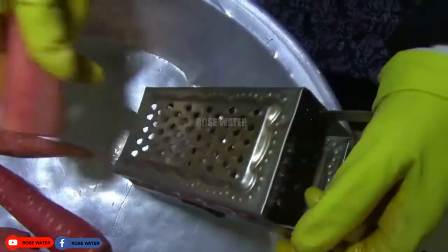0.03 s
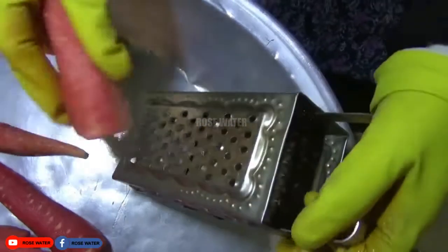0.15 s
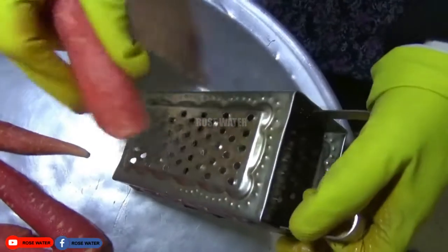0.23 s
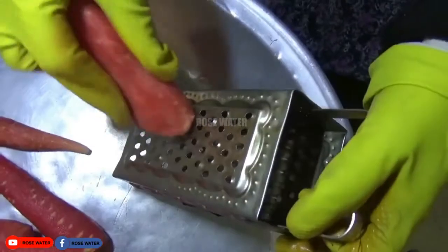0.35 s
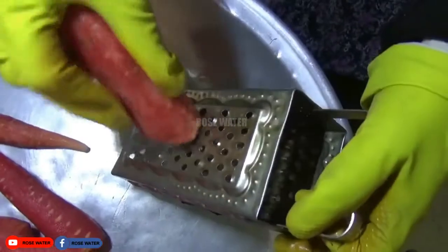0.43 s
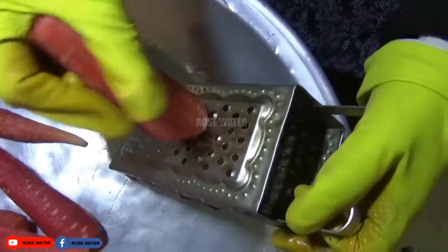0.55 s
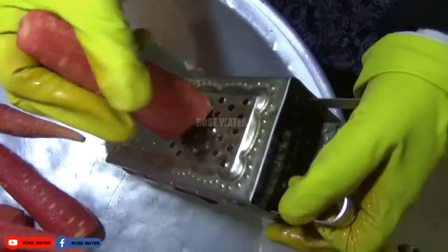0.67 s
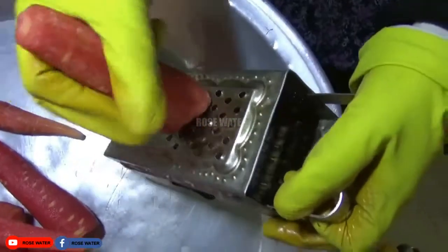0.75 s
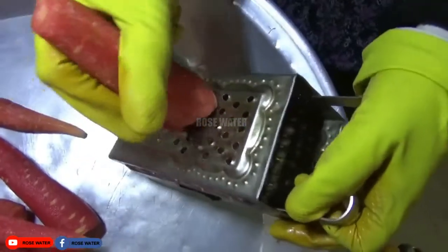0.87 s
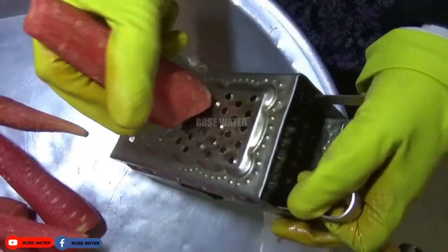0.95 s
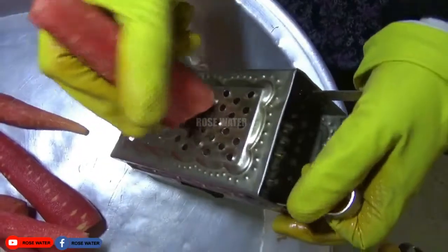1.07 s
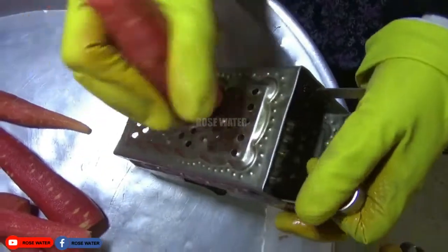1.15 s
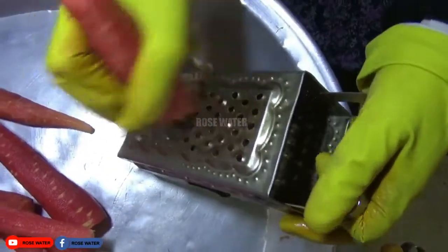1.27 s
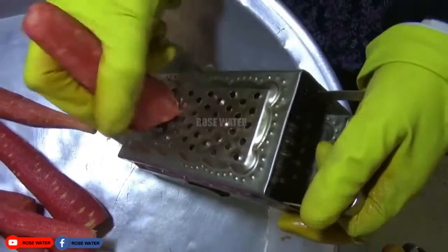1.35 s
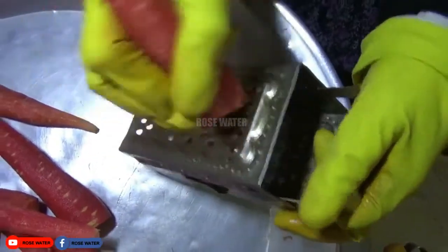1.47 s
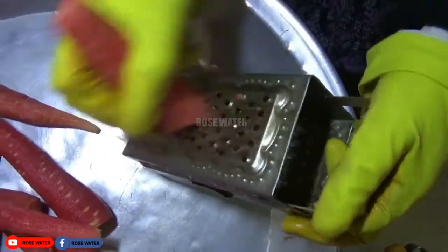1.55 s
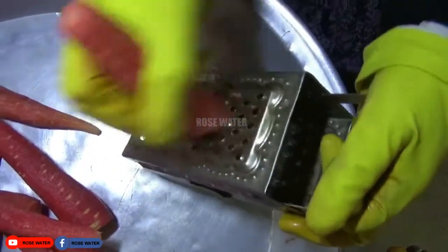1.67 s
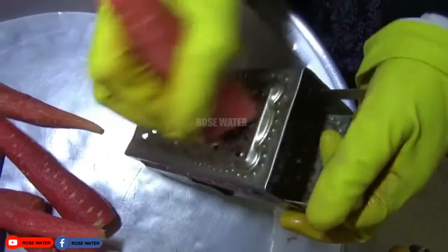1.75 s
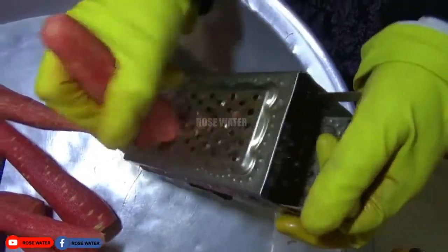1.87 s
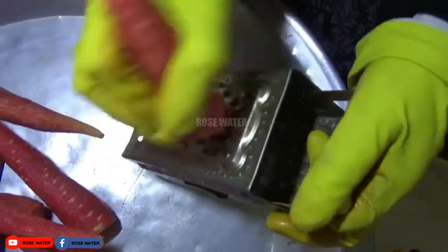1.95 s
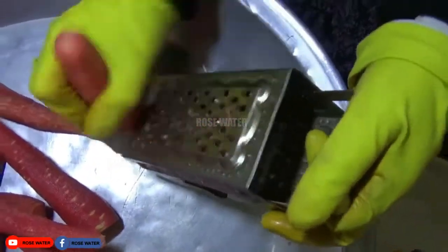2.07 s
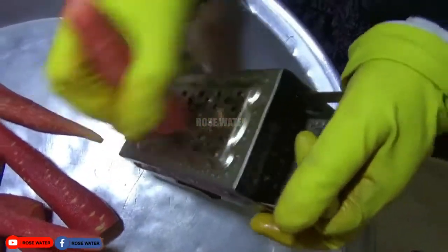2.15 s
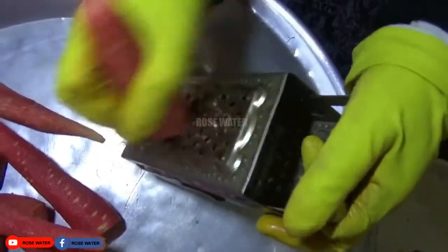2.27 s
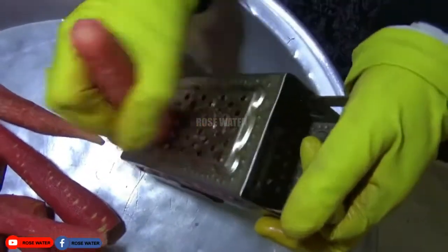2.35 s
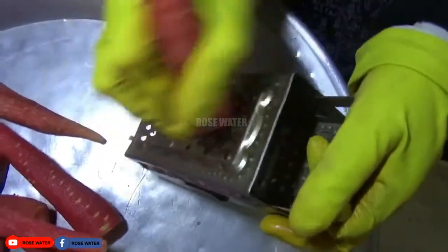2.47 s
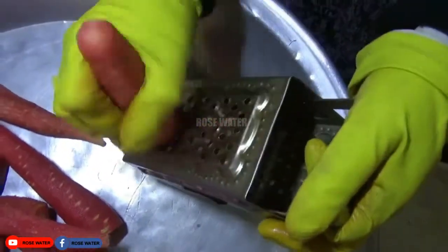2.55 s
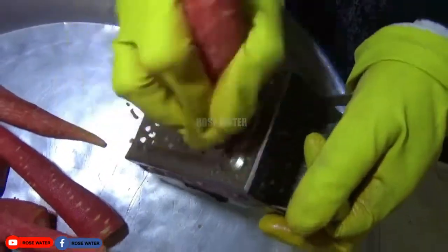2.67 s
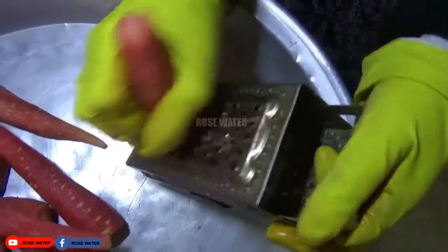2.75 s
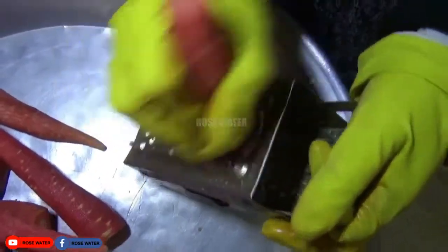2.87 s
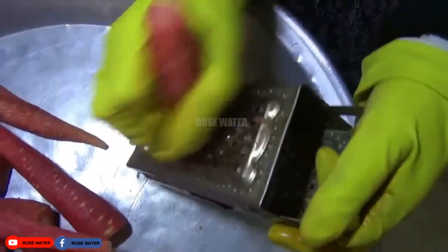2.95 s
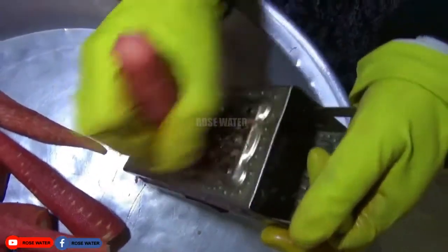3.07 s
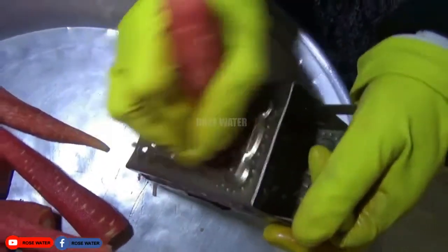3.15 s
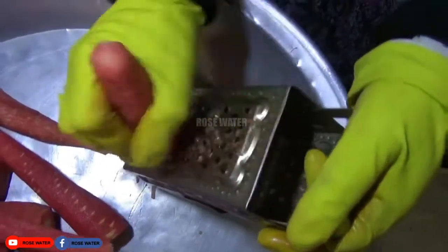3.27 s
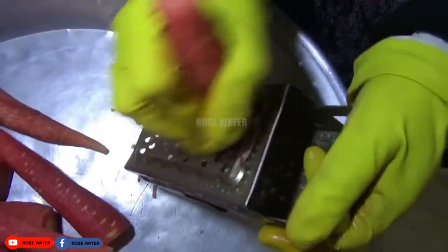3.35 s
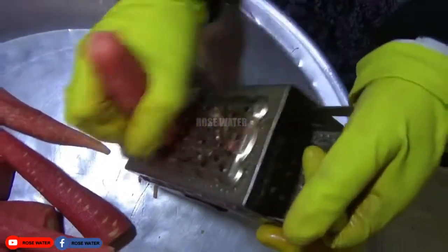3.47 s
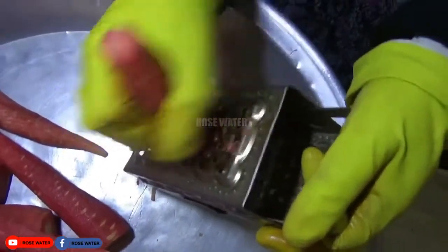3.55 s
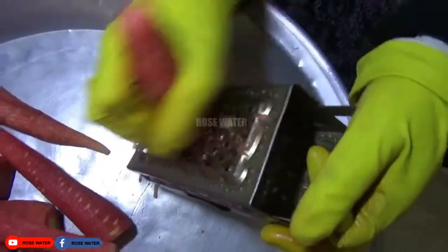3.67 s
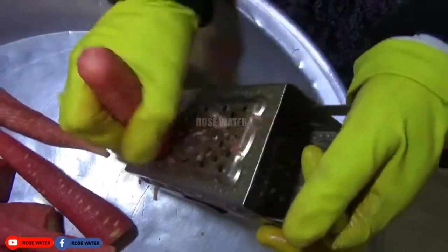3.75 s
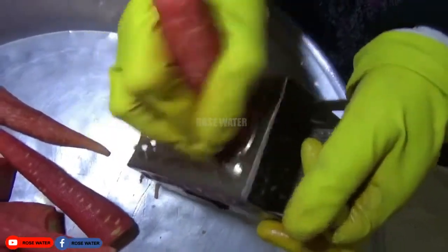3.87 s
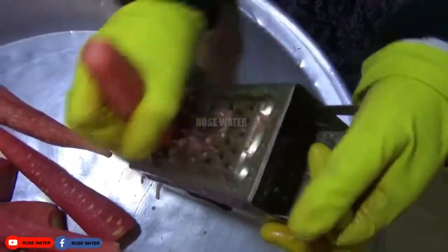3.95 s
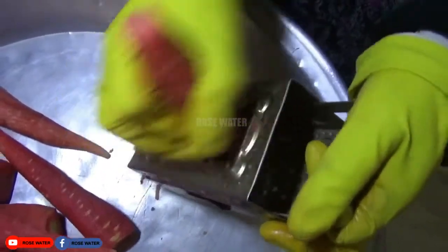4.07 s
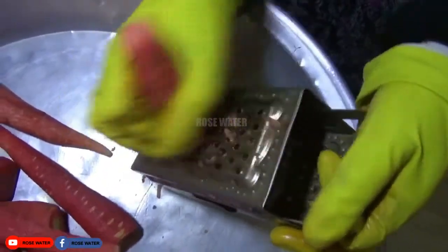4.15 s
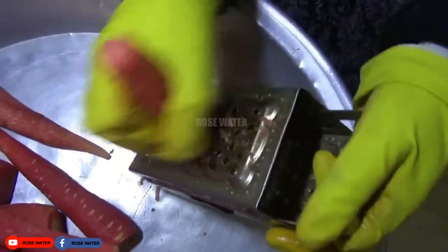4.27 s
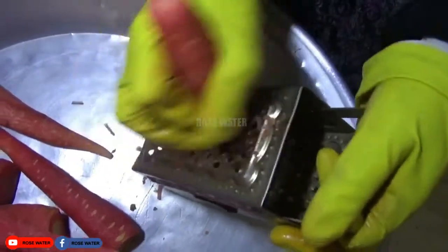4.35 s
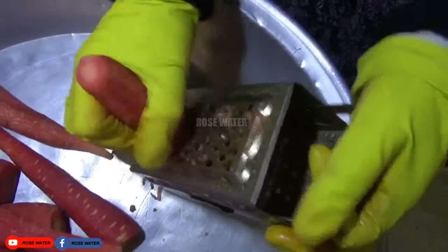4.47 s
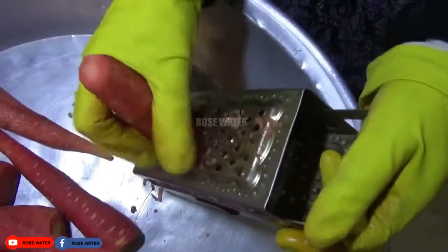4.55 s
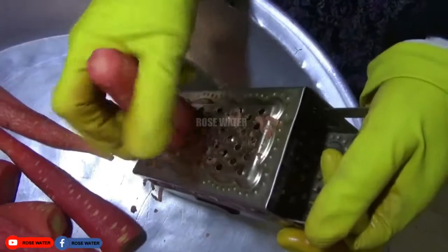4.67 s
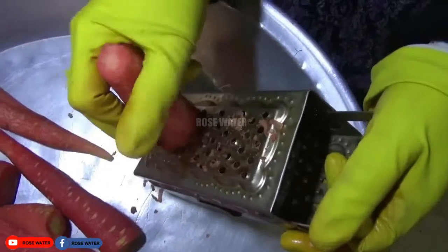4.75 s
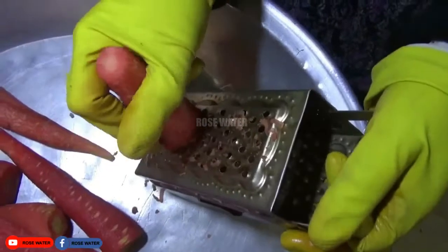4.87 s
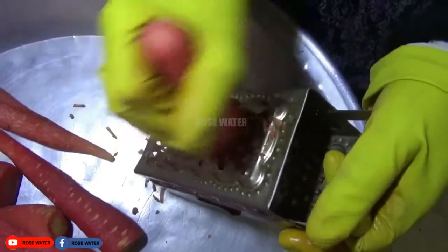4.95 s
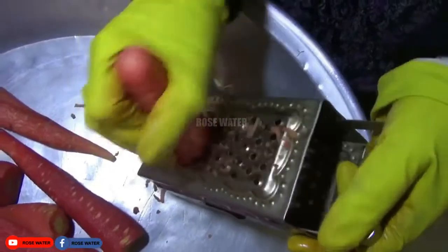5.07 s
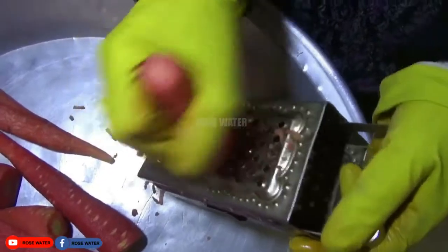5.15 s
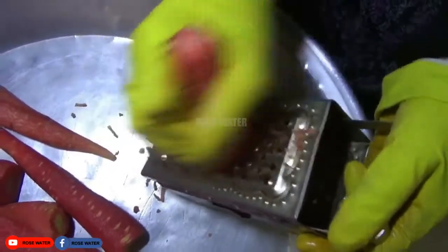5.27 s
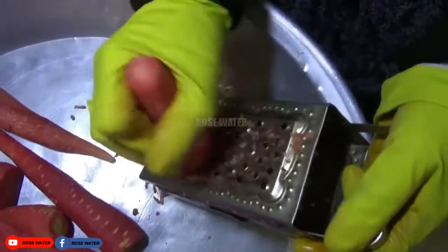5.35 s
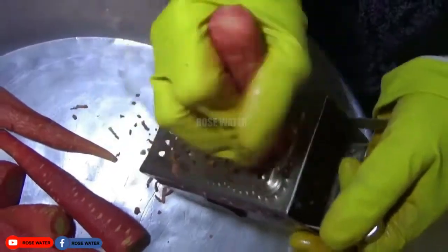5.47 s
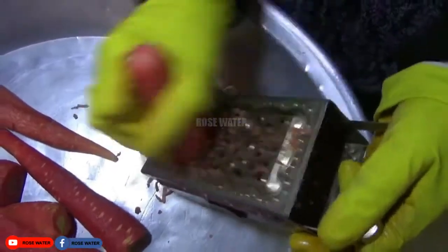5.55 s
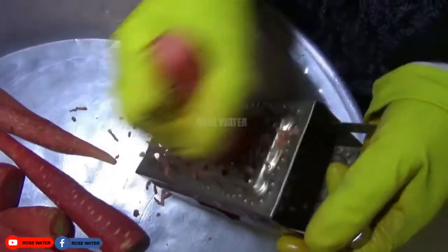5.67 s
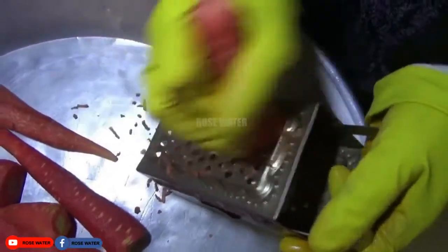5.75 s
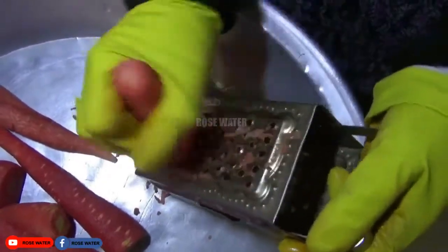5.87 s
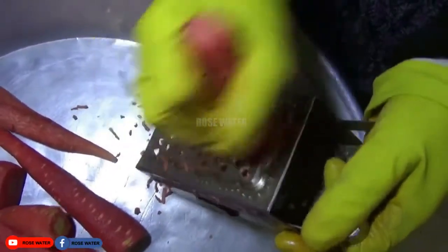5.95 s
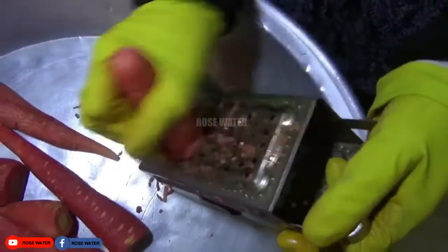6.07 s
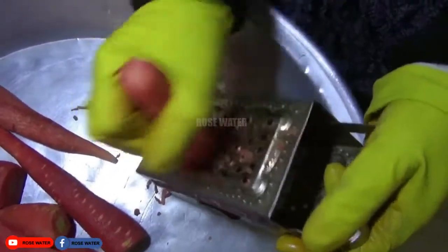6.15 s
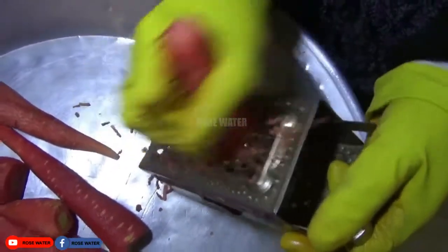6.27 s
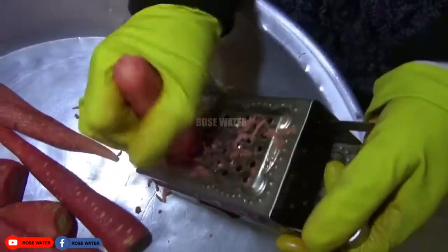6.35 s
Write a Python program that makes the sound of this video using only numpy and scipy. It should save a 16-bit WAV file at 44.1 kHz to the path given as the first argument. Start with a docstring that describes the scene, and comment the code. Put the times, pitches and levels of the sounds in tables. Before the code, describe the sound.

Close up in a kitchen, a carrot scrapes rapidly back and forth over a metal box grater, with a bright, gritty rasp and small hollow knocks. A few taps and faint rubber glove rustles come first. The strokes then run for about three seconds, with the steel tray clattering briefly underneath, break off for a short glove rustle, and resume at the same pace.

```python
"""A carrot rubbed fast up and down a sheet-metal box grater on a steel tray, in a kitchen, close to a
stereo microphone. The teeth tear fibres in dense clicks that ring the sheet and drum the hollow box.
The carrot lands with a knock and skips as it turns round; the grater bumps the tray, which rings.
Rubber gloves rustle in the pauses, over faint room air and short echoes."""
import sys
import numpy as np
from scipy import signal
from scipy.fft import rfft, irfft
from scipy.io import wavfile
from scipy.ndimage import uniform_filter1d

SR = 44100
rng = np.random.default_rng(int(sys.argv[2]) if len(sys.argv) > 2 else 0)


def digitize_waveform(pressure):
    """Quantize a signal to 16-bit integers and store it at the path in sys.argv[1].

    Rows of a 2-D input are taken as channels; values are limited to [-1, 1].
    """
    field = np.atleast_2d(pressure).T
    bounded = np.clip(field, -1, 1)
    quanta = np.round(bounded * 32767).astype(np.int16)
    wavfile.write(sys.argv[1], SR, quanta)


N = 282681
STEP_S = .001  # time step of the hand's gestures

# strokes of the carrot: start_s, length_s, level_db, bite (1 cuts down into the teeth, 0 drags back)
STROKES = [(1.479, 0.061, -20, 0.63), (1.614, .085, -21.5, 0.081), (1.746, 0.068, -17.5, 0.51),
           (1.883, 0.068, -21, 0.088), (1.989, 0.073, -18.5, 0.79), (2.127, 0.063, -21.5, 0.58),
           (2.228, 0.063, -19.5, 1), (2.307, 0.026, -20.5, 0.041), (2.337, 0.065, -23, .02),
           (2.389, 0.04, -23, 0.46), (2.461, .079, -18.5, 0.6), (2.581, 0.049, -23, .2),
           (2.639, 0.019, -24, 0.45), (2.701, 0.068, -19, 1), (2.822, 0.066, -22, 0.5),
           (2.927, 0.064, -18, 0.88), (3.049, 0.072, -22.5, 0.075), (3.154, 0.066, -18.5, 0.93),
           (3.29, 0.07, -22.5, 0.29), (3.384, 0.081, -18, 0.69), (3.517, 0.078, -24, 0.13),
           (3.626, 0.071, -18, 0.98), (3.766, .075, -21.5, .1), (3.863, 0.09, -18.5, 0.85),
           (4.001, 0.085, -21.5, 0.43), (4.113, 0.078, -18, 0.77), (4.248, 0.043, -24, 0.41),
           (4.294, 0.034, -23.5, .2), (4.349, 0.085, -17.5, 0.59), (4.5, 0.05, -20.5, 0.044),
           (4.579, 0.06, -18, .9), (5.119, 0.078, -28, 0.58), (5.236, 0.062, -17.5, 0.49),
           (5.383, .064, -23, 0.1), (5.478, 0.078, -18, 0.38), (5.626, 0.067, -21.5, 0.2),
           (5.73, .075, -17.5, 0.6), (5.873, 0.077, -20.5, 0.12), (5.976, 0.081, -18, 0.76),
           (6.132, 0.067, -20.5, 0.4), (6.234, 0.066, -18, 0.9), (6.373, .06, -26, 0.14)]
# resonances of the grater's sheet: pitch_hz, width_hz, level_db
SHEET_MODES = [(263, 7.3, -9), (820, 135, -11.5), (1330, 50, -22), (2176, 130, -6), (3160, 280, -43),
               (4170, 34, -5), (5270, 670, -17.5), (6100, 96, -5), (6900, 380, 1.5), (7900, 760, -2),
               (10130, 370, -6.5)]


def gain_of(db):
    """Decibels to amplitude."""
    return 10 ** (np.asarray(db) / 20)


def unit_rms(x):
    """Scales x to an RMS of one."""
    return x / np.sqrt(np.mean(x ** 2) + 1e-20)


def steadied(x):
    """Takes out chance swells slower than about 15 ms, so that the hand sets the level."""
    return x / np.sqrt(uniform_filter1d(uniform_filter1d(x ** 2, 600), 600) + 1e-9)


def smoothed(grid, bins, frames):
    """Averages a spectrogram-shaped grid over frequency and time."""
    return uniform_filter1d(uniform_filter1d(grid, bins, axis=0), frames, axis=1)


def curve_at(points, hz):
    """Interpolates (frequency_hz, value) points over log frequency."""
    points_hz, values = np.transpose(points)
    return np.interp(np.log(hz + 1), np.log(points_hz + 1), values)


def coloured(x, spectrum):
    """Filters x by a spectrum in dB, to unit RMS."""
    hz = np.fft.rfftfreq(len(x), 1 / SR)
    return unit_rms(irfft(rfft(x) * gain_of(curve_at(spectrum, hz)), len(x)))


def band_passed(x, low_hz, high_hz):
    """One band of x, at unit RMS."""
    band = signal.butter(2, [low_hz, high_hz], "band", fs=SR, output="sos")
    return unit_rms(signal.sosfilt(band, x))


def clicks(per_s, spread_db):
    """Clicks at random times and of random sign; a few are larger."""
    size = gain_of(spread_db * np.minimum(rng.exponential(1, N), 2.5))
    return size * rng.choice([-1., 1.], N) * (rng.random(N) < per_s / SR)


def wandering(x, narrow_db, wide_db):
    """The contact moves, so narrow modes and wide bands flare and fade at random."""
    hz, t, spectra = signal.stft(x, SR, nperseg=1024, noverlap=896)
    narrow, wide = rng.standard_normal((len(t), len(hz), 2)).T
    flare_db = narrow_db * unit_rms(smoothed(narrow, bins=2, frames=10))
    flare_db += wide_db * unit_rms(smoothed(wide, bins=24, frames=4))
    return unit_rms(signal.istft(spectra * gain_of(flare_db), SR, nperseg=1024, noverlap=896)[1][:N])


def played_by_hand(level_db, treble_db, low_db, judder_db, high, low):
    """Gestures (rows over time) shape a high and a low texture; the loudest one sets the colour."""
    power = gain_of(2 * level_db)
    total = power.sum(axis=0) + 1e-12
    below_peak_db = np.clip(level_db - level_db.max(axis=1, keepdims=True), -20, 0)
    treble_db = treble_db + 0.15 * below_peak_db  # a gesture is duller away from its peak
    blends = [(power * db).sum(axis=0) / total for db in (treble_db, low_db, judder_db)]
    t, steps_s = np.arange(N) / SR, np.arange(len(total)) * STEP_S
    level_db = np.interp(t, steps_s, 10 * np.log10(total))
    treble_db, low_db, judder_db = (np.interp(t, steps_s, blend) for blend in blends)
    middle = signal.sosfiltfilt(signal.butter(2, 6700, fs=SR, output="sos"), high)
    treble_gain = gain_of(treble_db)
    high = (steadied(middle) + treble_gain * steadied(high - middle)) / np.sqrt(1 + treble_gain ** 2)
    # the contact catches and lets go
    judder = unit_rms(uniform_filter1d(uniform_filter1d(rng.standard_normal(N), 300), 300))
    return gain_of(level_db + judder_db * judder) * (high + gain_of(low_db) * steadied(low))


def kitchen_air():
    """Room tone: a faint, steady, low hush."""
    # spectrum of the air: frequency_hz, level_db
    spectrum = [(60, -17), (200, 18), (700, -9), (2200, -13), (8000, -20), (15800, -25)]
    return gain_of(-83) * coloured(rng.standard_normal(N), spectrum)


def kitchen_echoes(near):
    """The room answers with sparse reflections from about 7 ms on, each band dying at its own speed."""
    # decay of the kitchen: frequency_hz, t60_s
    decay = [(200, 0.28), (1000, 0.4), (4000, 0.26), (12000, 0.022)]
    taps = np.zeros(SR // 2)
    slots = np.arange(300, len(taps) - 20, 20)
    taps[slots + rng.integers(0, 20, len(slots))] = rng.choice([-1., 1.], len(slots))
    hz, t, spectra = signal.stft(taps, SR, nperseg=256)
    tail = signal.istft(spectra * gain_of(-60 * t / curve_at(decay, hz)[:, None]), SR, nperseg=256)[1]
    return signal.fftconvolve(near, tail / np.linalg.norm(tail))[:N]


def tray_reflections(mid):
    """Side signal: hands and grater move, so reflections reach the microphone in shifting phase."""
    # stereo width: frequency_hz, side_above_mid_db
    width = [(60, -11), (130, -46), (290, -20), (640, -14.5), (1410, -11), (3100, -10.5), (6820, -14),
             (15000, -37)]
    hz, t, spectra = signal.stft(mid, SR, nperseg=512)
    real, imaginary = rng.standard_normal((len(t), len(hz), 2)).T
    paths = smoothed(real + 1j * imaginary, bins=5, frames=8)
    paths /= np.sqrt(np.mean(abs(paths) ** 2))
    return signal.istft(spectra * paths * gain_of(curve_at(width, hz))[:, None], SR, nperseg=512)[1][:N]


def gloves():
    """Fine rubbery crackle; each rustle swells to a peak and dies away more slowly. The same crackle carries
    the rattle dying away after the grater's opening clank."""
    # glove rustles and light scuffs, the first two rows being the rattle dying away after the grater's opening
    # clank: peak_s, length_s, level_db, treble_above_middle_db
    rustles = [(0.031, 0.019, -27, -3), (0.087, 0.089, -35.5, -3), (.23, 0.32, -50, -5),
               (0.38, 0.013, -14.5, 9), (0.453, 0.39, -48.5, .6), (0.678, 0.045, -37, 3.5),
               (.8, 0.35, -47, -1.5), (0.917, 0.033, -37.5, -1.5), (0.941, 0.048, -42, -3),
               (1.014, 0.053, -39, 2.2), (1.129, 0.041, -39, 9), (1.174, .03, -27.5, 1.5),
               (1.28, 0.54, -51, .6), (1.327, 0.038, -39, 4.5), (1.383, 0.034, -42.5, 5),
               (4.867, 0.1, -51.5, -18), (4.89, 0.15, -51, 9.5), (4.955, .015, -50, 2),
               (4.999, 0.049, -42.5, 4), (5.03, 0.037, -41, 5)]
    peak_s, length_s, peak_db, treble_db = np.array(rustles).T[:, :, None]
    lengths_past_peak = (np.arange(0, N / SR + STEP_S, STEP_S) - peak_s) / length_s
    level_db = peak_db - 18.5 * np.maximum(lengths_past_peak, -lengths_past_peak / 0.52)
    low_db = -8.5 - 0.86 * treble_db  # brighter rustles have less of the dull part
    # spectra of the rubber: frequency_hz, level_db
    bright = [(1400, -13.5), (2200, -3.5), (4000, -10), (9000, -16.5), (12000, -25), (15500, -41),
              (17000, -55)]
    dull = [(100, -25), (300, -5), (700, 0), (1500, -5), (2400, -25)]
    high = coloured(clicks(per_s=3800, spread_db=0.62), bright)
    low = coloured(clicks(per_s=2000, spread_db=3.0), dull)
    high = wandering(high, narrow_db=5.4, wide_db=0.63)
    low = wandering(low, narrow_db=7.5, wide_db=1.3)
    return played_by_hand(level_db, treble_db, low_db, judder_db=1.1, high=high, low=low)


def tray_ring(t):
    """Each mode is a cluster of close tones, damped by the hand, so it rattles rather than sings."""
    # modes of the steel tray: pitch_hz, level_db, t60_s
    modes = [(151.6, -16, 0.46), (207, -8.5, 0.36), (323.6, -9.5, 0.57), (540, -2, 0.23), (717, -8.5, 0.41),
             (900, -6, 0.36), (1186, 2, 0.19), (2160, -14.5, 0.24), (2860, -1, 0.16)]
    out = np.zeros(len(t))
    for hz, db, t60_s in modes:
        pole = np.exp((2j * np.pi * hz - np.pi * .07 * hz) / SR)  # 7 % of the pitch wide
        cluster = unit_rms(signal.lfilter([1], [1, -pole], rng.standard_normal(len(t))).real)
        out += gain_of(db + 2.54 * (rng.random() - 1.5) - 60 * t / t60_s) * cluster
    return out


def knocks():
    """A soft-edged blow of a few cycles, a broad clack, a rattle around its pitch, and the tray's ring."""
    # the carrot landing on the grater, except the row at 4.684 s, the grater bumping the tray, and the one at
    # 5.669 s, a tooth catching so the sheet pings: start_s, level_db, pitch_hz, clack_above_blow_db
    landings = [(0.358, -18, 670, -5), (0.548, -31.5, 210, -10), (0.575, -20, 930, -8.5),
                (1.093, -19.5, 715, -7.5), (1.472, -15, 940, -10), (1.741, -14, 990, -15),
                (1.892, -20, 570, -2), (1.982, -14, 1160, -19), (2.189, -12.5, 806, -7),
                (2.206, -16, 1280, -8), (2.697, -13.5, 1170, -9.5), (2.924, -17, 1150, -10),
                (3.052, -12.5, 750, -5.5), (3.154, -15.5, 1180, -17), (3.378, -13.5, 1030, -13),
                (3.86, -16.5, 1170, -18), (4.115, -16.5, 1180, -22), (4.266, -17, 775, -26),
                (4.347, -22, 790, 2), (4.577, -14.5, 1210, -10), (4.684, -32.5, 684, 4),
                (4.893, -36, 543, -30), (4.97, -39, 724, -16), (5.117, -36, 545, 14.5),
                (5.226, -18, 2000, -25), (5.479, -15.5, 1360, -6.5), (5.629, -44, 2150, -16),
                (5.669, -22, 2200, -11), (5.728, -13, 1130, -18), (5.816, -22.5, 320, -12),
                (5.973, -14.5, 1190, -11)]
    # the grater bumping on the tray: start_s, level_db, pitch_hz, clack_above_blow_db
    bumps = [(0.016, -15.5, 594, -1.5), (2.309, -17.5, 790, 2), (2.342, -14, 610, -19),
             (2.365, -15, 530, -4.5), (2.391, -23, 606, -6), (2.455, -20, 795, -13),
             (4.221, -15.5, 736, -23)]
    t, out = np.arange(9000) / SR, np.zeros(N + 9000)
    onset = 1 - np.exp(-t / 0.00061)
    for hits, ring_db in ((landings, -17), (bumps, -8.5)):
        for start_s, db, hz, clack_db in hits:
            rise = hz * t / 1.28  # peaks after 1.28 cycles
            blow = np.sin(2 * np.pi * hz * t) * rise * np.exp(1 - rise)
            noise = rng.standard_normal(len(t))
            clack = band_passed(noise, 1500, 6000) * gain_of(clack_db - 60 * t / 0.035)
            top_hz = np.clip(3300 * gain_of(.5 * (clack_db + 4)), 2 * hz, 4500)  # soft blows are duller
            rattle = band_passed(noise, 0.5 * hz, top_hz) * gain_of(-60 * t / 0.049)
            clatter = clack + rattle + gain_of(ring_db) * tray_ring(t)
            out[round((start_s + .001) * SR):][:len(t)] += gain_of(db) * (blow + onset * clatter)
    return out[:N]


def skips():
    """The carrot skips once more on the teeth as it turns round: a short bright scratch."""
    # skips on the teeth: start_s, level_db
    scratches = [(1.844, -29), (2.792, -26), (3.252, -30), (4.476, -25), (5.8363, -18), (6.0912, -25.5),
                 (6.339, -21.5)]
    t, out = np.arange(1500) / SR, np.zeros(N + 1500)
    rise = t / 0.003
    for start_s, db in scratches:
        scratch = band_passed(rng.standard_normal(len(t)), 2500, 12000)
        out[round(start_s * SR):][:len(t)] += gain_of(db) * scratch * rise * np.exp(1 - rise)
    return out[:N]


def tooth_pings(per_stroke=4):
    """A tooth catches hard and one middle resonance of the sheet sings out, most on the way back."""
    t, out = np.arange(1500) / SR, np.zeros(N + SR)
    rise = t / .0025
    middle_hz = [hz for hz, _, _ in SHEET_MODES if 2000 < hz < 4600]
    for start_s, length_s, db, bite in STROKES:
        for when, which, detune, size in rng.random((per_stroke, 4)):
            hz = middle_hz[int(which * len(middle_hz))] * (1 + 0.082 * (detune - .5))
            peak_db = db + np.interp(bite, [0, 1], [-4, -8]) + 9.7 * (size - .5)
            ping = np.sin(2 * np.pi * hz * t) * rise * np.exp(1 - rise)
            out[round((start_s + when * .9 * length_s) * SR):][:len(t)] += gain_of(peak_db) * ping
    return out[:N]


def through_sheet(x, lift_db):
    """Adds the grater's resonances to the direct sound."""
    hz = np.fft.rfftfreq(N, 1 / SR)
    modes = sum(gain_of(db) * .5 * width_hz / (.5 * width_hz + 1j * (hz - pitch_hz))
                for pitch_hz, width_hz, db in SHEET_MODES)
    return unit_rms(irfft(rfft(x) * (1 + gain_of(lift_db) * modes), N))


def stroke_gestures():
    """Level, treble, drumming and judder of each stroke and of the soft slide as the hand turns round."""
    start_s, length_s, db, bite = np.array(STROKES).T[:, :, None]

    def by_bite(dragging, cutting):
        return dragging + (cutting - dragging) * bite

    t = np.arange(0, N / SR + STEP_S, STEP_S) - start_s
    position = 2 * np.clip(t / length_s, 0, 1) - 1  # -1 at the start of a stroke, 1 at its end
    past_end_s = np.maximum(t - length_s, 0)
    rise_db_per_s, fall_db_per_s = by_bite(706, 2602), by_bite(1102, 867)
    sag_db, swell_db = by_bite(6.5, -1.5), by_bite(3, 1.7)
    attack_db = db + rise_db_per_s * np.minimum(t, 0)
    stroke_db = attack_db - fall_db_per_s * past_end_s - sag_db * position ** 2 + swell_db * position / 2
    slide_db = attack_db + by_bite(-18.5, -14.5) - 139 * past_end_s
    to_next_s = np.append(start_s[1:], np.inf)[:, None] - start_s
    slide_db -= 2602 * np.maximum(t - to_next_s, 0)  # the next stroke takes over
    level_db = np.vstack([stroke_db, slide_db])
    treble_db = np.vstack([by_bite(-1.5, 5), np.zeros_like(db)])
    drum_db = np.vstack([by_bite(-7, -12), np.full_like(db, 2.5)])
    judder_db = np.vstack([by_bite(2.5, 1.23), np.full_like(db, 2.5)])
    return level_db, treble_db, drum_db, judder_db


def grating():
    """Teeth tear the carrot's fibres in dense clicks; sparser jolts drum the hollow box."""
    # spectrum of the tearing fibres: frequency_hz, level_db
    fibre_spectrum = [(880, -51), (1500, -11.5), (1790, -6), (2870, -1), (4130, -3), (4470, -7.5),
                      (5230, -4), (6250, -8), (9730, -5.5), (12000, -12.5), (15800, -26.5)]
    # spectrum of the box and tray: frequency_hz, level_db
    box_spectrum = [(15, -49), (25, -16.5), (106, -13), (243, -1.5), (401, -11.5), (556, 1.5), (757, -2),
                    (973, -1.5), (1200, -1), (1540, -5), (2500, -16), (3250, -23), (5500, -120)]
    tearing = coloured(clicks(per_s=9000, spread_db=3.0), fibre_spectrum)
    rasp = wandering(through_sheet(tearing, lift_db=-8), narrow_db=3.0, wide_db=1.9)
    jolts = coloured(clicks(per_s=1500, spread_db=2.4), box_spectrum)
    drum = wandering(through_sheet(jolts, lift_db=9.6), narrow_db=3.6, wide_db=4.9)
    return played_by_hand(*stroke_gestures(), high=rasp, low=drum)


def scene():
    """The grater close up and centred, the kitchen faint behind it; left and right channels."""
    near = grating() + gloves() + knocks() + skips() + tooth_pings()
    mid = near + gain_of(-17.5) * kitchen_echoes(near) + kitchen_air()
    side = tray_reflections(mid)
    return np.array([mid + side, mid - side])


def record(dry):
    """The close microphone: soft overload rounds the peaks, and the band ends at 15.9 kHz."""
    low_pass = signal.firwin(1023, 15900, window=("kaiser", 9), fs=SR)
    return signal.oaconvolve(0.77 * np.tanh(dry / 0.87), low_pass[None], "same")


dry = scene()
out = record(dry)
digitize_waveform(out)
```